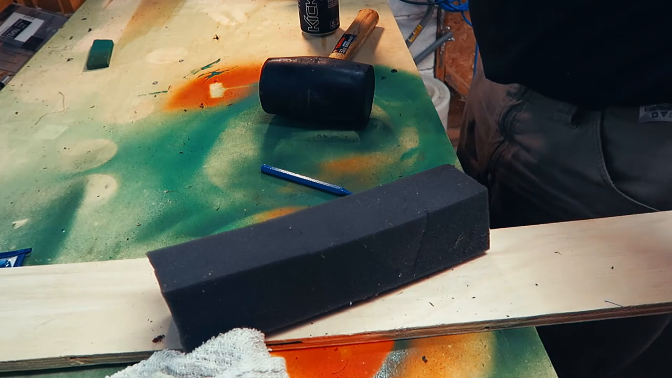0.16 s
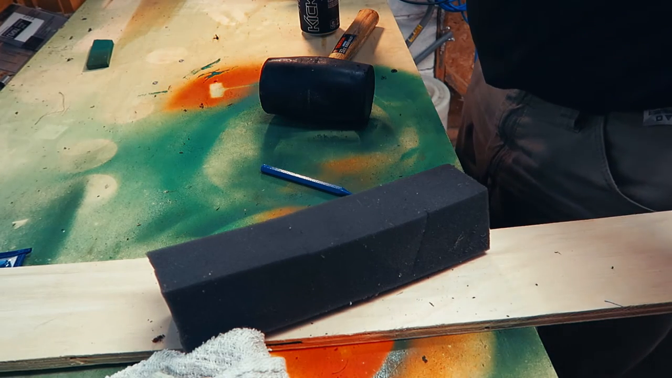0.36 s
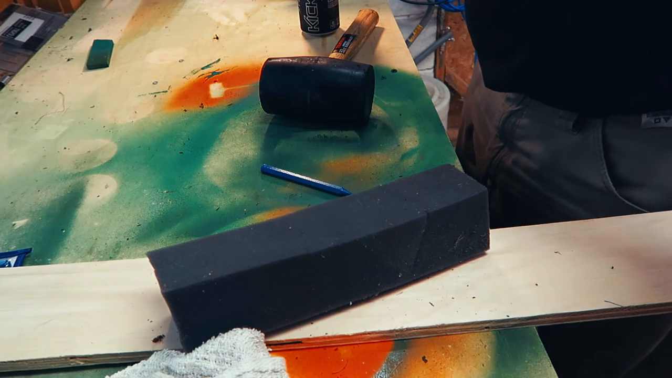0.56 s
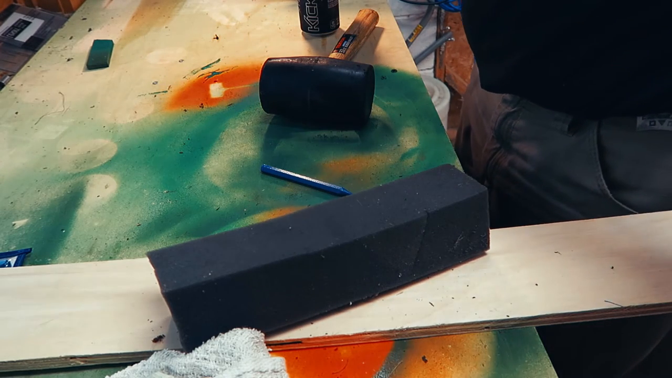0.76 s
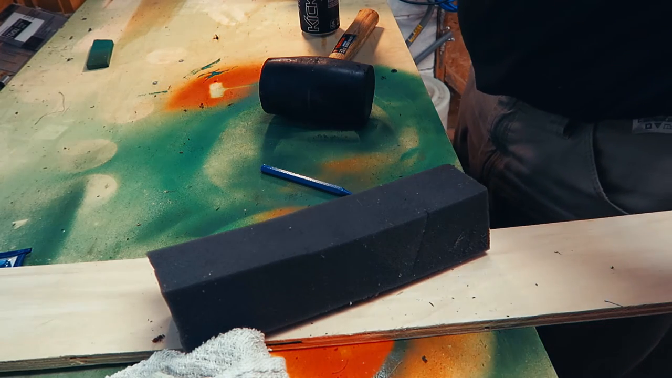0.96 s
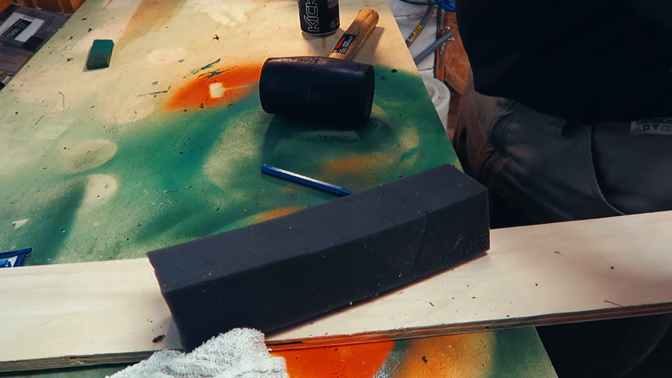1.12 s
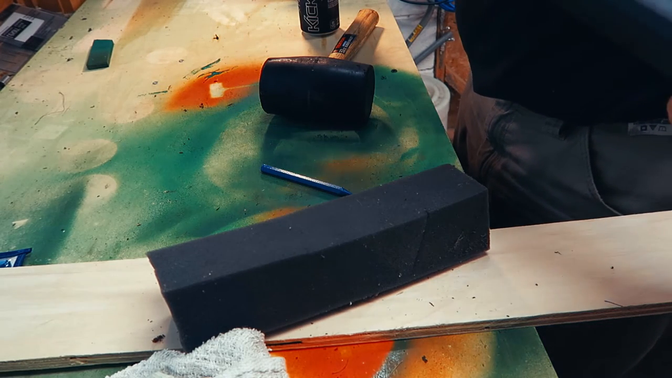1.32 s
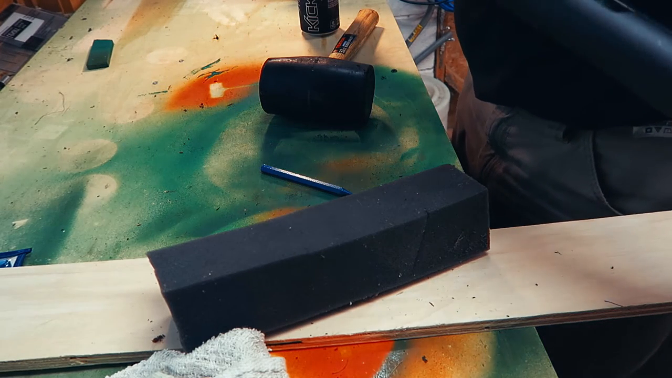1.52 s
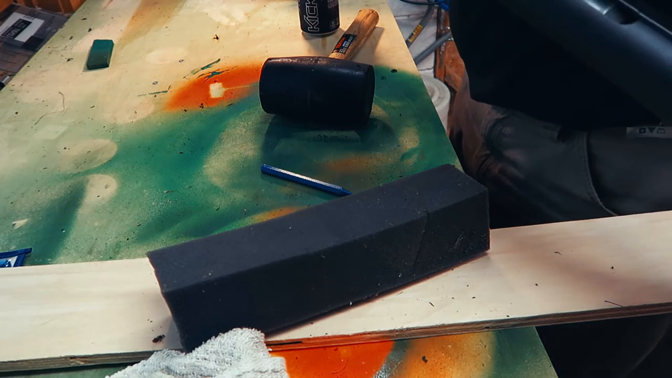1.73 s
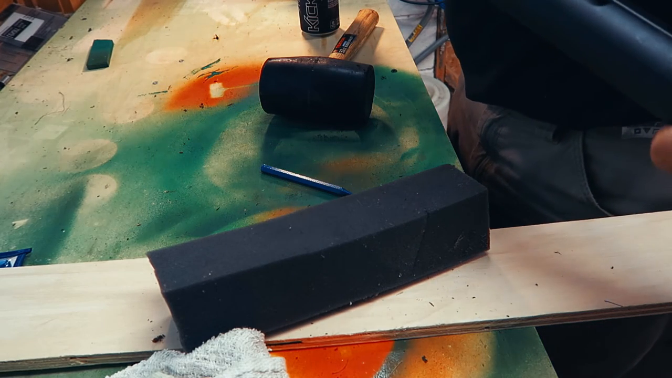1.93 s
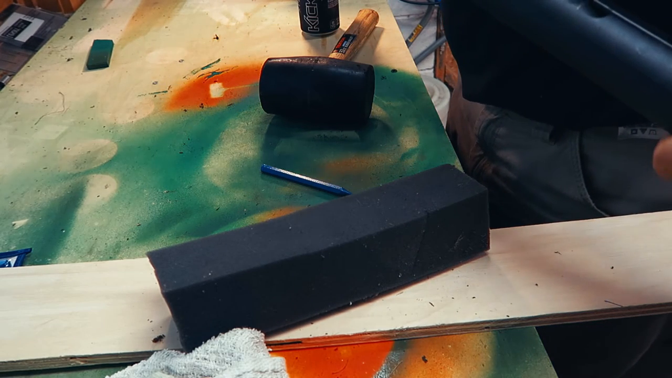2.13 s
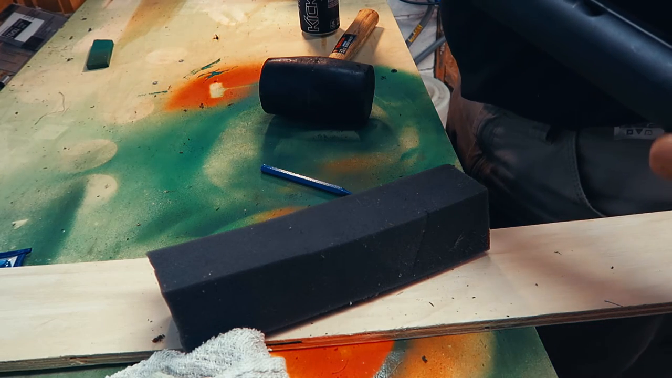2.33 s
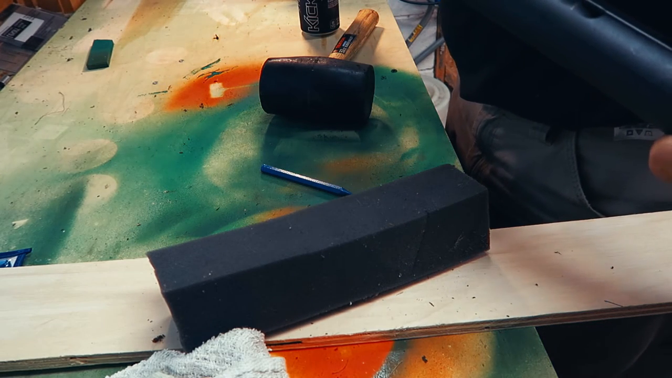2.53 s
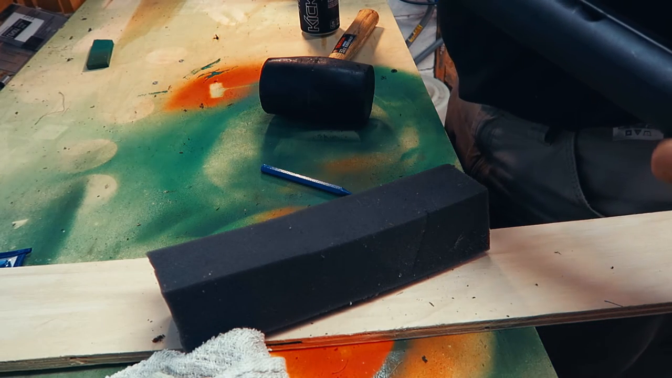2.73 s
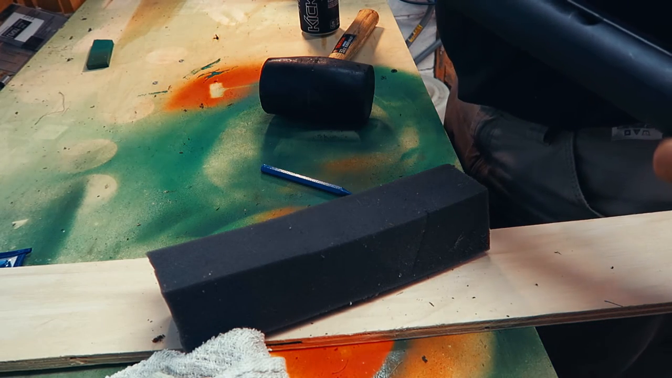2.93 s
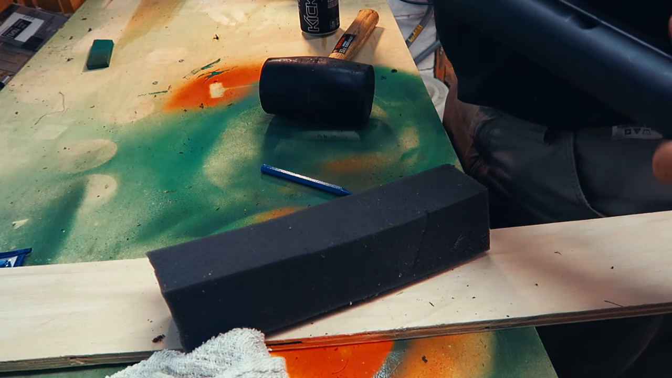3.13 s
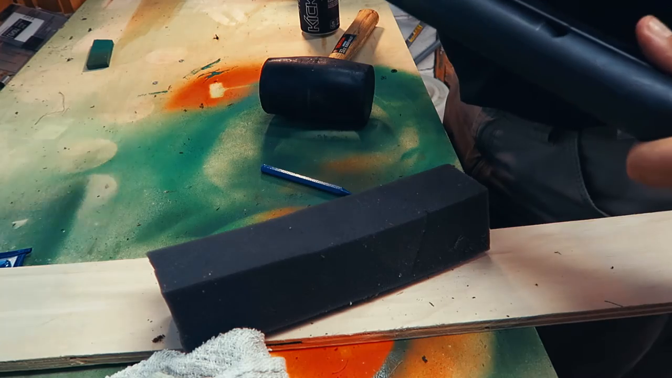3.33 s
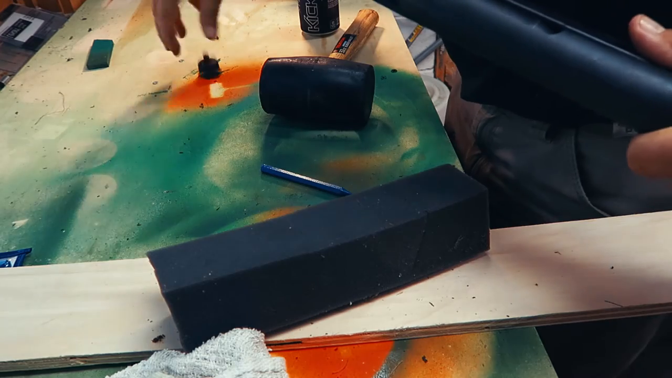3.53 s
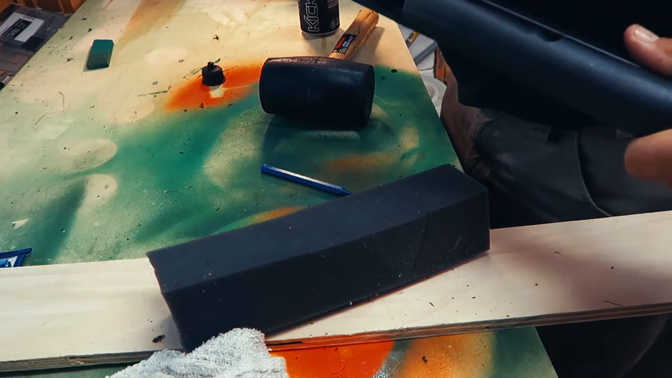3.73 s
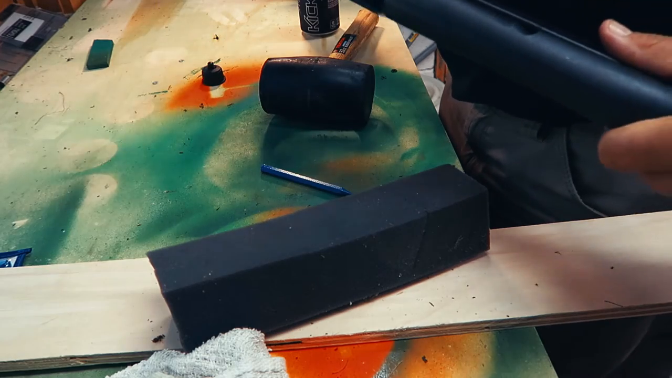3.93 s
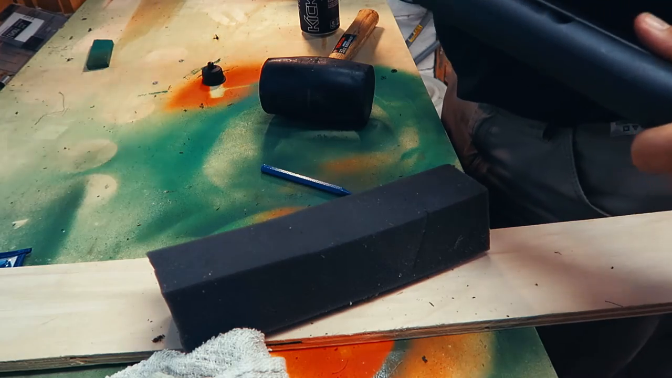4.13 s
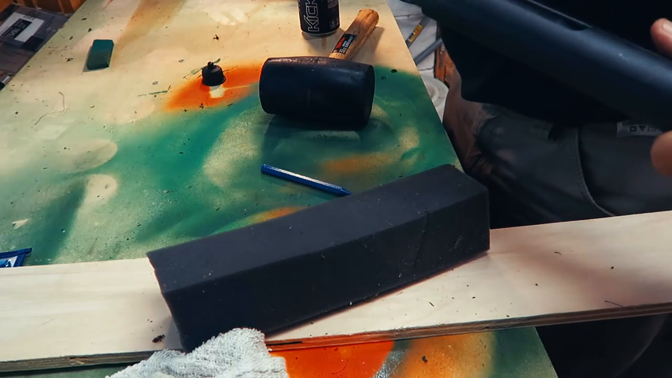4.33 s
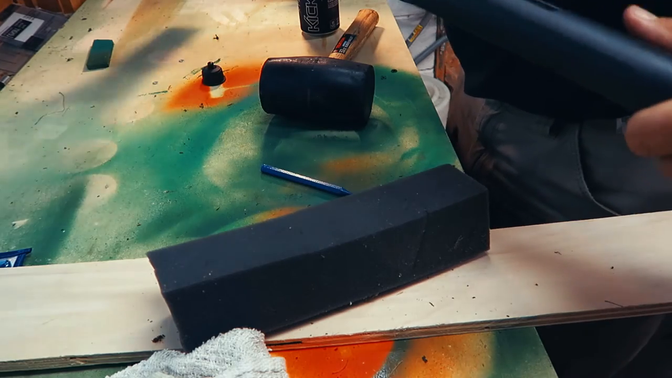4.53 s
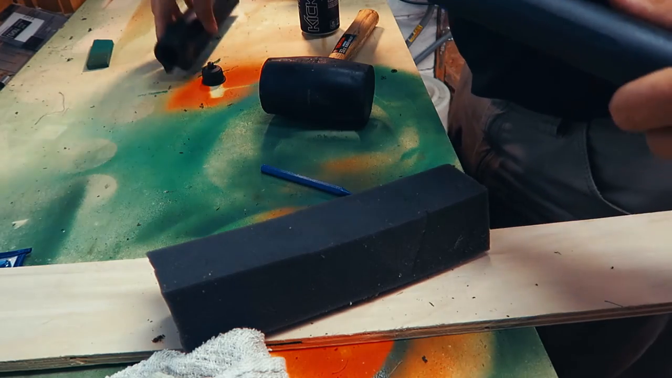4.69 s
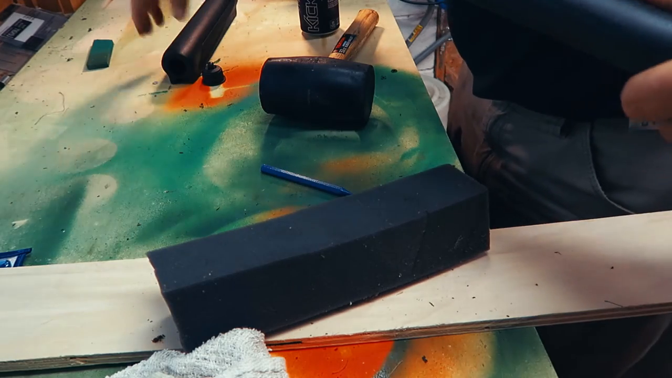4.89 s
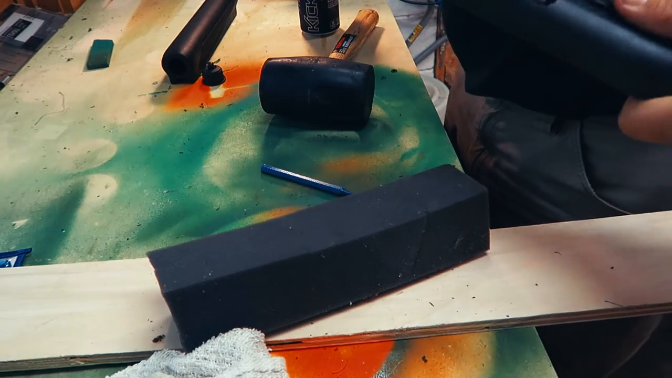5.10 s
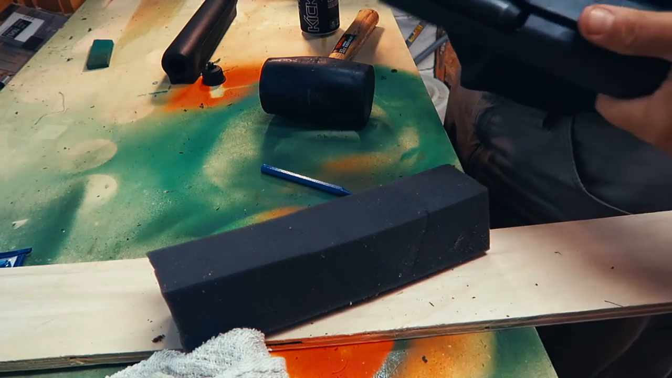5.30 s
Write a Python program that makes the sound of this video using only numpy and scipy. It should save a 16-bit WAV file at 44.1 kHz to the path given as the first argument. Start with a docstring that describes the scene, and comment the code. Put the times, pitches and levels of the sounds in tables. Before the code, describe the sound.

Dry, close, nearly central metal handling on a workbench: light ticks, a quick train of crisp detent clicks, a pause, a faster second train, then clusters of loose knocks and gritty rubbing. A sharp knock on wood marks the cap being put down. The grip then scrapes and clatters off the tube and is laid down with a rocking, woody clunk. Short sparse echoes suggest a small room; the loudest hits distort slightly.

```python
"""Steel cap unscrewed in a workshop

Small workshop, two close microphones: a knurled steel cap on a gun's tube ratchets over a detent, rattles off
its thread and is put down hard on a wooden bench; a hollow grip slides off the tube and is laid down.
Short ragged contacts ring damped modes of cap, tube, bench and grip; rubbing is a stream of tiny catches.
Ticks, a singing rim, rumble and rustle are added; sparse echoes make the room, and loud peaks overload."""
import sys
import numpy as np
from scipy import signal
from scipy.fft import rfft, irfft, next_fast_len
from scipy.io import wavfile
from scipy.ndimage import uniform_filter1d

SR = 44100
rng = np.random.default_rng(int(sys.argv[2]) if len(sys.argv) > 2 else 0)


def store_wav(level_fs):
    """Save 16-bit WAV to argv[1]."""
    pcm = np.round(np.clip(np.atleast_2d(level_fs), -1, 1) * 32767)
    wavfile.write(sys.argv[1], SR, pcm.T.astype(np.int16))


N = 240565  # samples


def gain_of(db):
    """Decibels to an amplitude factor."""
    return 10 ** (np.asarray(db) / 20)


def evened(x):
    """Scales to rms 1."""
    return x / np.sqrt(np.mean(x ** 2) + 1e-20)


def read(points, hz):
    """Looks up a spectrum on a log frequency axis."""
    f, value = np.transpose(points)
    return np.interp(np.log(hz + 1), np.log(f + 1), value)


def coloured(x, points):
    """Weights x by a spectrum in dB."""
    hz = np.fft.rfftfreq(x.shape[-1], 1 / SR)
    return irfft(rfft(x) * gain_of(read(points, hz)), x.shape[-1])


def add(mix, s, sound):
    """Mixes a sound in at s seconds."""
    part = mix[:, round(s * SR):][:, :sound.shape[1]]
    part += sound[:, :part.shape[1]]


def ring(x, modes, extra_db):
    """Passes x through damped modes; neighbours swing in opposite phase."""
    f, width, db = np.transpose(modes)
    size = next_fast_len(x.shape[-1] + 4096)
    hz = np.fft.rfftfreq(size, 1 / SR)[:, None]
    each_mode = 1j * hz * width / (f ** 2 - hz ** 2 + 1j * hz * width)
    signed_gain = gain_of(db + extra_db) * (-1.) ** np.arange(len(f))
    return irfft(rfft(x, size) * (each_mode @ signed_gain), size)


def by_force(table, hard_db, softer_per_db):
    """Gives each blow a hardness (dB per octave) that grows with its strength."""
    return [(s, db, hz, hard_db + softer_per_db * db) for s, db, hz in table]


def blows(table, modes, push_db, contact_ms, favour_db, scatter_db, lead_db, chatter_db, chatter_s, soft_hz):
    """Each blow is a short ragged contact that rings the modes, most of all those near the spot struck."""
    out, f = np.zeros((2, N)), np.transpose(modes)[0]
    before = 256  # samples ahead of the contact
    t = (np.arange(2048) - before) / SR
    yielding = signal.butter(2, soft_hz, fs=SR)  # a soft surface starves the treble
    u = np.maximum(t, 0) * 1000 / contact_ms * 4
    # surfaces slide up to the contact, push quickly, then chatter
    pulse = u ** 2 * np.exp(-u)
    lead = gain_of(lead_db) * np.exp(-abs(t) / .002)
    chatter = gain_of(chatter_db) * np.minimum(u, 1) * np.exp(-t / chatter_s)
    shape = lead + pulse + chatter
    push = gain_of(push_db) * evened(pulse)  # the one-way shove that moves the lowest modes
    for s, db, hz, hard in table:
        spectrum = rfft(shape * rng.standard_normal((2, len(t))))
        # a hard contact drives all pitches about evenly
        contact = irfft(spectrum / abs(spectrum) ** .5) * shape ** 0.18
        contact = signal.lfilter(*yielding, evened(contact) + push)
        spot_db = favour_db * np.exp(-(np.log2(f / hz) / 0.18) ** 2)
        spot_db = spot_db + scatter_db * rng.standard_normal(len(f))
        tilt_db = hard * np.log2(np.maximum(f, 1200) / 2000)
        sound = ring(contact, modes, spot_db + tilt_db)
        add(out, s - before / SR, gain_of(db) * sound / abs(sound).max(1, keepdims=True))
    return out


# Tone of the workshop: t/s, rumble level/dB, level/dB of the rustle of clothes and hands
AMBIENCE = [(0, -60, -59.5), (.3, -60, -59.5), (.47, -56.5, -68.5), (.95, -66, -59), (1.299, -68, -62),
            (1.5, -58, -60.5), (1.95, -65.5, -61), (2.361, -64, -62.5), (2.651, -58.5, -64),
            (3.632, -56.5, -53.5), (3.85, -71, -63.5), (4.3, -66.5, -63), (4.8, -62.5, -62.5),
            (5.15, -68, -70.5), (5.45, -67, -66.5)]
# Spectrum of the rumble: f/Hz, relative level/dB
RUMBLE_COLOUR = [(12, -34), (20, -3.5), (70, 3.5), (275, -5), (437, -13.5), (615, -27), (670, -11),
                 (730, -13.5), (1120, -27), (1200, -25.5), (1560, -43.5), (2640, -120)]
# Spectrum of the rustle: f/Hz, relative level/dB
RUSTLE_COLOUR = [(240, -24), (400, -2.5), (742, -13.5), (1140, -11), (1270, -15.5), (1900, -15),
                 (2510, -17), (2880, -19), (3750, -22.5), (13700, -35.5), (16000, -62)]


def room_tone():
    """Low rumble and patchy rustle, both noise, each drifting in level."""
    frames, hz = N // 128 + 5, np.fft.rfftfreq(512, 1 / SR)
    s, rumble_db, rustle_db = np.transpose(AMBIENCE)
    t = np.arange(N) / SR
    rumble = evened(coloured(rng.standard_normal((2, N)), RUMBLE_COLOUR))
    z = rng.standard_normal((2, 257, frames)) + 1j * rng.standard_normal((2, 257, frames))
    # patches in pitch and time, and a flicker of the whole rustle
    patches = uniform_filter1d(rng.standard_normal((257, frames)), size=5, axis=0)
    patches = evened(uniform_filter1d(patches, size=14, axis=1))
    flicker = evened(uniform_filter1d(rng.standard_normal(frames), size=6))
    z *= gain_of(read(RUSTLE_COLOUR, hz)[:, None] + 0.74 * patches + 0.6 * flicker)
    rustle = evened(signal.istft(z, nperseg=512, noverlap=384)[1][:, :N])
    rumble_gain, rustle_gain = (gain_of(np.interp(t, s, db)) for db in (rumble_db, rustle_db))
    return rumble_gain * rumble + rustle_gain * rustle


# Metal rubbing on metal, a row a stroke: t/s of the peak, level/dB of the peak, rise/s, fade/s
RUB_STROKES = [(.028, -48, 0.24, 0.16), (.26, -56, 0.035, .2), (0.401, -51.5, 0.024, 0.52),
               (0.439, -33.5, 0.0059, 0.037), (1.374, -41.5, .008, 0.052), (1.46, -57.5, 0.03, 0.46),
               (1.555, -46.5, 0.029, .02), (2.053, -38, 0.0041, 0.28), (2.19, -41, 0.21, 0.058),
               (2.252, -34, .008, 0.072), (2.41, -52, 0.051, .03), (2.418, -61.5, 0.013, 0.87),
               (2.506, -30.5, .012, 0.072), (2.734, -27, 0.0027, 0.045), (2.803, -28.5, 0.066, 0.11),
               (3.117, -30, 0.027, 0.11), (3.166, -28, .1, 0.016), (3.2, -50, .03, 0.1),
               (4.006, -38, 0.014, 0.17), (4.064, -21, 0.0078, 0.058), (4.172, -15.5, 0.096, 0.052),
               (4.41, -52.5, 0.047, 0.091)]
# Modes of the tube, rung by rubs and knocks: f/Hz, width/Hz, level/dB
TUBE_MODES = [(337, 140, -20), (700, 120, -14), (907, 130, -12), (1252, 110, -2), (1530, 58, -3.5),
              (1666, 59, -2.5), (1903, 289, -5), (2430, 210, -7.5), (2640, 230, -10.5), (3438, 610, -18),
              (4279, 500, -22), (6040, 2400, -29), (6250, 440, -23), (11260, 1800, -34.5)]
RUB_SPAN_DB = 30  # a stroke gains this over its rise and loses it over its fade
RUB_BRIGHT_DB = 4.5  # lift of the upper modes at the peak
UPPER_LOSS = 1.22  # dB the upper modes lose for each dB the stroke lacks


def rubs():
    """Thousands of tiny catches a second ring the tube; a lighter touch is duller."""
    shape, t = (2, N), np.arange(0, N, 32) / SR
    size = gain_of(3.8 * np.minimum(rng.exponential(1, shape), 4))
    catches = size * (rng.random(shape) < 2500 / SR) * rng.choice([-1, 1], shape)
    low, high = np.zeros((2, len(t)))  # power of the lower and upper modes
    for s, db, rise, fade in RUB_STROKES:
        lack_db = RUB_SPAN_DB * np.maximum((s - t) / rise, (t - s) / fade)
        low += gain_of(db - lack_db) ** 2
        high += gain_of(db + RUB_BRIGHT_DB - UPPER_LOSS * lack_db) ** 2
    low, high = (np.interp(np.arange(N) / SR, t, power) for power in (low, high))
    hz = np.fft.rfftfreq(N, 1 / SR)
    tube = ring(catches, TUBE_MODES, 0)[:, :N]
    upper = irfft(rfft(tube) / (1 + (2700 / (hz + 1)) ** 6), N)  # above about 2700 Hz
    return (np.sqrt(low) * (tube - upper) + np.sqrt(high) * upper) / np.std(tube)


# Faint ticks and rings of loose parts: t/s, level/dB, ring f/Hz, t60/s
LOOSE_TICKS = [(.015, -37, 2900, 0.015), (0.028, -39, 1490, 0.011), (.049, -35.5, 1560, 0.013),
               (.12, -48.5, 1163, .6), (.4, -39.5, 4700, 0.028), (1.072, -41, 439, 0.13),
               (1.188, -38, 1850, 0.036), (1.303, -42, 1720, 0.044), (1.332, -51.5, 1740, 0.013),
               (1.373, -22, 2078, 0.098), (1.454, -24.5, 559, 0.085), (1.453, -33.5, 2800, 0.028),
               (1.503, -31.5, 2920, 0.014), (4.471, -55, 2193, 0.23), (4.605, -56, 2205, .27),
               (4.95, -43, 1248, 0.63)]
# the longer a part rings, the less snap it has
SNAP_DB, SNAP_DB_PER_DOUBLING, SNAP_T60_S = -4, -7.5, .03


def ticks():
    """A noisy snap and one decaying, unsteady ring each."""
    out, t = np.zeros((2, N)), np.arange(15000) / SR
    for s, db, hz, t60 in LOOSE_TICKS:
        wobble = 1 + .5 * evened(uniform_filter1d(rng.standard_normal((2, len(t))), size=150))
        envelope = gain_of(-60 * t / t60) * (1 - np.exp(-t / 0.00017))
        tone = wobble * np.sin(2 * np.pi * hz * t) * envelope
        snap = uniform_filter1d(rng.standard_normal((2, len(t))), size=7) * np.exp(-t / 0.00089)
        snap_db = SNAP_DB + SNAP_DB_PER_DOUBLING * np.log2(t60 / SNAP_T60_S)
        add(out, s, gain_of(db) * (.5 * tone + gain_of(snap_db) * snap))
    return out


# Loose knocks on the tube: t/s, peak level/dB, favoured f/Hz, hardness/dB per octave
KNOCKS = [(0.239, -38, 1810, -2.3), (0.258, -41.5, 1217, 0.3), (0.462, -35, 1316, -1.5),
          (0.959, -41, 1920, -8), (2.051, -20.5, 1270, -5), (2.063, -17, 1250, 1.9),
          (2.09, -19.5, 1940, -4.5), (2.124, -29.5, 1260, 5.5), (2.249, -26, 2210, 4.5),
          (2.255, -32.5, 2110, 4.5), (2.418, -20.5, 1830, -4.3), (2.435, -16.5, 1320, 2.8),
          (2.484, -21.5, 1810, 3.3), (2.507, -22, 1300, 3.5), (2.543, -27.5, 1900, 3.5),
          (2.733, -20.5, 1900, -3.5), (2.768, -20.5, 1490, -0.5), (2.788, -18.5, 2330, 3),
          (2.807, -16, 1890, 0.5), (2.832, -35.5, 1330, 3.5), (2.864, -27, 1295, -1), (2.878, -32, 1350, 2),
          (3.073, -31.5, 1280, -6.5), (3.098, -24, 1280, -4.8), (3.109, -18.5, 1860, -3),
          (3.135, -21, 1850, 1), (3.152, -14, 1300, -0.4), (3.16, -19.5, 1740, 0.1),
          (3.167, -14, 1926, 1.4), (3.943, -30, 1274, -9), (3.995, -22, 1270, -3), (4.005, -14, 1270, -4),
          (4.041, -30, 1225, 3), (4.064, -11.5, 1786, 2.5), (4.138, -9.5, 1886, -10.5),
          (4.15, -4.5, 2110, -0.5), (4.172, -9, 1307, -10), (4.212, -16.5, 1486, 1),
          (4.4, -49.5, 1690, 0.5), (5.292, -35.5, 1933, 4), (5.414, -46, 2300, 4)]


def rattle():
    """Loose knocks ring the tube, each with its own hardness."""
    return blows(KNOCKS, TUBE_MODES, push_db=-31, contact_ms=1.6, favour_db=5.0, scatter_db=2.0,
                 lead_db=-26.0, chatter_db=-13, chatter_s=0.014, soft_hz=15480)


# The cap clicks over the detent: t/s, peak level/dB, f/Hz of the modes favoured by the spot struck
DETENT_CLICKS = [(0.438, -25, 1970), (0.495, 2.5, 3770), (0.519, -1, 1960), (0.544, -2, 3300),
                 (0.576, -0.5, 2010), (0.599, -5, 1930), (0.616, -4, 1610), (0.634, -3.5, 1720),
                 (0.654, -2.5, 3480), (0.679, -3.5, 1750), (0.701, -4, 3450), (0.721, -5, 1600),
                 (0.741, -6, 1430), (0.763, -5, 2400), (0.789, -3.5, 1180), (0.817, -14.5, 1240),
                 (0.821, -7.5, 1695), (0.926, -23.5, 1550), (1.56, -0.5, 1900), (1.577, 0.5, 1834),
                 (1.593, 0.5, 1840), (1.612, -1, 1840), (1.633, -7, 1570), (1.656, -3, 1940),
                 (1.674, -10.5, 1280), (1.687, -8.5, 1230), (1.699, -6, 1780), (1.713, -6.5, 2740),
                 (1.728, -10.5, 2730), (1.741, -10.5, 1920), (1.751, -5, 1740), (1.762, -8, 2070),
                 (1.772, -9.5, 1740), (1.784, -11.5, 1710), (1.798, -18, 1900), (1.875, -29.5, 1310)]
# Modes of the steel cap: f/Hz, width/Hz, level/dB
CAP_MODES = [(300, 140, -26.5), (584, 120, -15.5), (897, 190, -10), (1287, 79, -1), (1526, 94, -0.5),
             (1883, 270, 3), (1980, 214, 5), (2260, 380, -5), (2856, 310, -7), (3450, 370, -10),
             (4134, 336, -7), (4220, 780, -12), (6050, 600, -16), (6770, 730, -19.5), (11480, 770, -19),
             (12600, 3300, -31.5)]


def ratchet():
    """Detent clicks ring the cap; weak clicks are duller."""
    clicks = by_force(DETENT_CLICKS, hard_db=3.5, softer_per_db=0.14)
    return blows(clicks, CAP_MODES, push_db=-26, contact_ms=1.9, favour_db=8.0, scatter_db=1.5,
                 lead_db=-9, chatter_db=-15, chatter_s=.012, soft_hz=18200)


# The cap lands on the bench and bounces: t/s, peak level/dB, favoured f/Hz
CAP_LANDINGS = [(3.634, -24, 1893), (3.639, -19.5, 1494), (3.6437, 12, 1250), (3.646, 8, 1020),
                (3.649, 8.5, 2036), (3.6522, -0.5, 1500), (3.6563, -3.5, 1100), (3.6642, -8, 1000)]
# Modes of the wooden bench: f/Hz, width/Hz, level/dB
BENCH_MODES = [(55, 58, -20), (106, 140, -22.5), (229.3, 34, -15), (356, 74, -15.5), (490, 52, -7.5),
               (664.4, 40, -3.5), (856, 150, -3), (1005, 240, 1), (1218, 250, 1.5), (1399, 120, 3),
               (1706, 160, -1.5), (2020, 300, -2.5), (2295, 320, -1), (2870, 950, -8.5), (3700, 800, -14.5),
               (4950, 1000, -24.5), (6160, 1800, -31.5), (11500, 14000, -36)]


def cap_drop():
    """The cap's landings ring the broad bench, which answers every one much alike."""
    landings = by_force(CAP_LANDINGS, hard_db=0, softer_per_db=0.19)
    return blows(landings, BENCH_MODES, push_db=-13.5, contact_ms=1.2, favour_db=1.5, scatter_db=.7,
                 lead_db=-58.5, chatter_db=-9.5, chatter_s=.008, soft_hz=14800)


RIM_S, RIM_DB, RIM_T60_S = 3.6645, -38, .45  # sings on after the last bounce
RIM_HZ, RIM_BEATS_PER_S = 11680, 13.3


def rim():
    """Two close modes of the cap's thin rim beat as they ring out clean."""
    out, t = np.zeros((2, N)), np.arange(SR // 2) / SR
    beat = np.sin(np.pi * RIM_BEATS_PER_S * t) * np.sin(2 * np.pi * RIM_HZ * t)
    add(out, RIM_S, gain_of(RIM_DB - 60 * t / RIM_T60_S) * beat[None])
    return out


# The grip is laid down and rocks: t/s, peak level/dB, favoured f/Hz
GRIP_LANDINGS = [(4.835, 2.5, 994), (4.842, -3.5, 955), (4.853, 1, 1035), (4.866, -4.5, 800),
                 (4.873, -8, 1270), (4.916, -9, 732), (4.929, -16.5, 686)]
# Modes heard as the hollow grip lands: f/Hz, width/Hz, level/dB
GRIP_MODES = [(220, 60, -13.5), (373, 49, -7), (509.5, 50, -1), (711, 56, -3.5), (868, 91, -6),
              (1000, 64, -7.5), (1180, 220, -9), (1323, 78, 0), (1660, 130, -2), (2140, 120, -3.5),
              (2530, 240, -13.5), (2850, 350, -13.5), (3700, 1100, -25.5), (5170, 1000, -27),
              (7460, 2200, -36)]


def grip_drop():
    """Softer, longer contacts ring the grip's modes; weak ones are duller."""
    landings = by_force(GRIP_LANDINGS, hard_db=0, softer_per_db=0.42)
    return blows(landings, GRIP_MODES, push_db=-18, contact_ms=2.7, favour_db=13.0, scatter_db=1.5,
                 lead_db=-53, chatter_db=-9.5, chatter_s=0.011, soft_hz=3940)


# Echoes of the small workshop: f/Hz, t60/s, echo level/dB
ROOM_ECHO = [(100, 0.57, -4), (300, 0.45, -4.5), (735, 0.18, -2), (1800, 0.33, -10.5), (4500, 0.15, 0),
             (8000, 0.12, -2), (12000, 0.15, -1)]


def workshop(x):
    """Sparse echoes of random sign build up, then die band by band; three paths take turns 23 times a second."""
    taps = np.zeros((6, SR // 2))
    at = np.arange(120, SR // 2 - 20, 20)
    at = at + rng.integers(0, 20, (6, len(at)))
    np.put_along_axis(taps, at, rng.choice([-1., 1.], at.shape), 1)
    taps *= 1 - np.exp(-np.arange(SR // 2) / SR / 0.0052)
    hz, t, z = signal.stft(taps, SR, nperseg=128)
    f, t60, db = np.transpose(ROOM_ECHO)
    t60 = read(list(zip(f, t60)), hz)[:, None]
    db = read(list(zip(f, db)), hz)[:, None]
    # energy of a tail grows with t60 and tap density, so both are divided out
    level = np.sqrt(20 * 6 * np.log(10) / (t60 * SR))
    tail = signal.istft(z * gain_of(db - 60 * t / t60) * level, SR, nperseg=128)[1]
    turn = 2 * np.pi * 23. * np.arange(N) / SR
    wet = np.zeros((2, N))
    for k in range(3):
        share = np.sqrt(2 / 3) * np.cos(turn + 2 * np.pi * k / 3)  # squares sum to 1
        wet += signal.fftconvolve(share * x, tail[2 * k:2 * k + 2], axes=1)[:, :N]
    return wet


# Stereo width of the handling and its echoes: f/Hz, side against mid level/dB
HANDLING_WIDTH = [(60, -23), (250, -26.5), (600, -18), (1400, -21.5), (3000, -15.5), (6800, -4.5),
                  (15000, -4.5)]
# Stereo width of the room tone: f/Hz, side against mid level/dB
AMBIENCE_WIDTH = [(60, -18.5), (180, 4.5), (550, 4), (1650, -2.5), (4970, -2), (15000, 5)]


def scene():
    """Everything is made twice, for the sum and for the difference of two close microphones."""
    gun = rubs() + ticks() + rattle() + ratchet()
    cap, grip = cap_drop(), grip_drop()
    echoes = workshop(gun + gain_of(-6) * cap + gain_of(-1) * grip)  # the faint rim stays dry
    mid, side = gun + cap + rim() + grip + echoes
    tone_mid, tone_side = room_tone()
    mid = mid + tone_mid
    side = coloured(side, HANDLING_WIDTH) + coloured(tone_side, AMBIENCE_WIDTH)
    return np.array([mid + side, mid - side])


# Overall tone colour, the treble dips, with a step down near 13 kHz: f/Hz, level/dB
TONE_COLOUR = [(20, 0.13), (7000, -3.5), (9200, -7), (11500, -10), (12500, -7.5), (13300, -16),
               (16000, -13.5)]
EDGE_HZ = 16200  # upper edge of the band


def record(dry):
    """Overall tone colour, overload at full scale, band limit."""
    hot = np.clip(coloured(dry, TONE_COLOUR), -1, 1)
    band_limit = signal.firwin(511, EDGE_HZ, window=("kaiser", 9), fs=SR)
    return signal.oaconvolve(hot, band_limit[None], "same")


dry = scene()
out = record(dry)
store_wav(out)
```